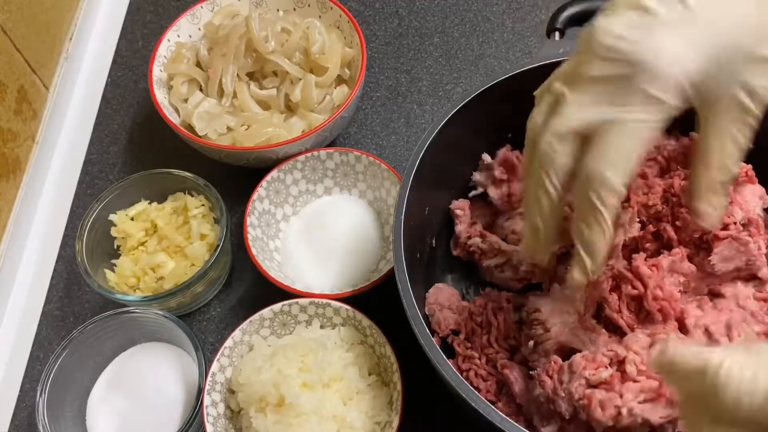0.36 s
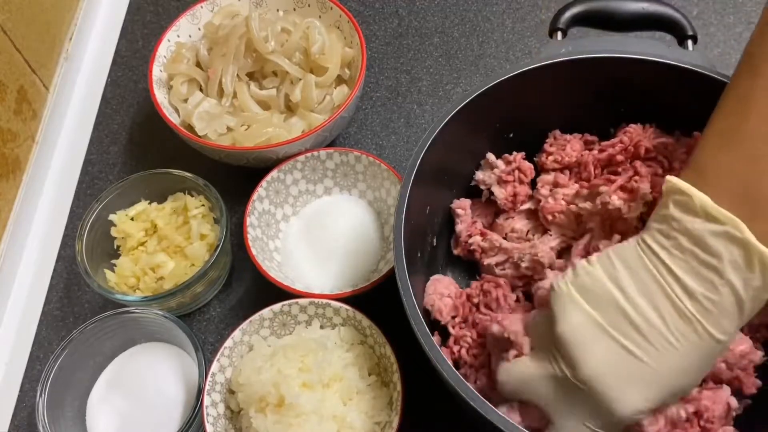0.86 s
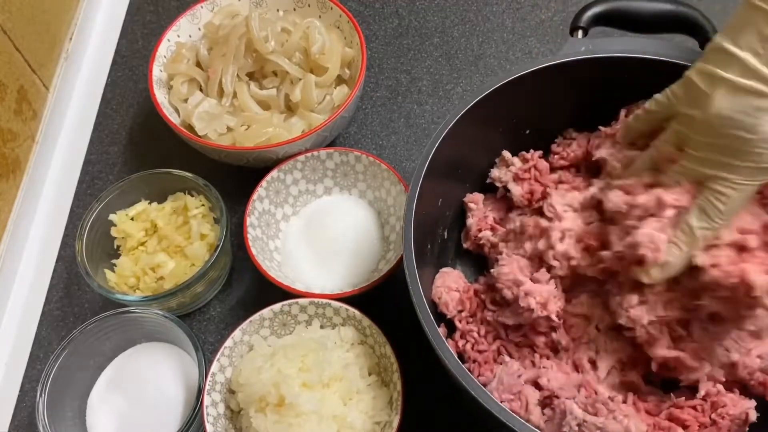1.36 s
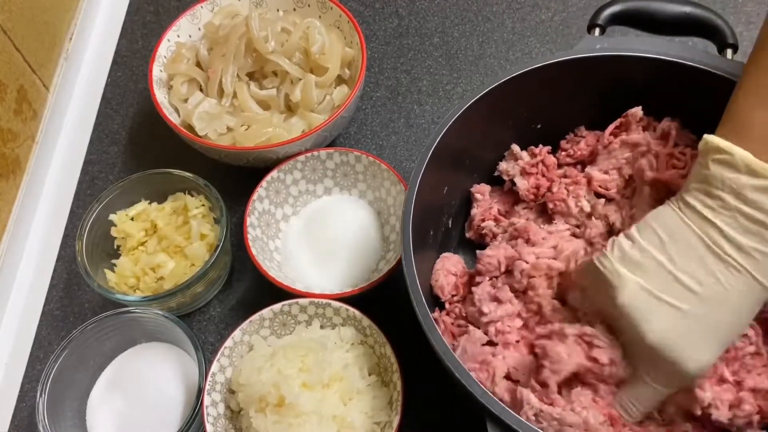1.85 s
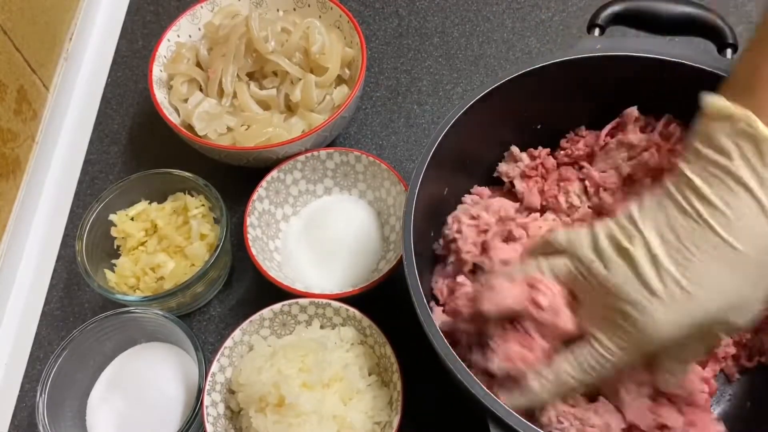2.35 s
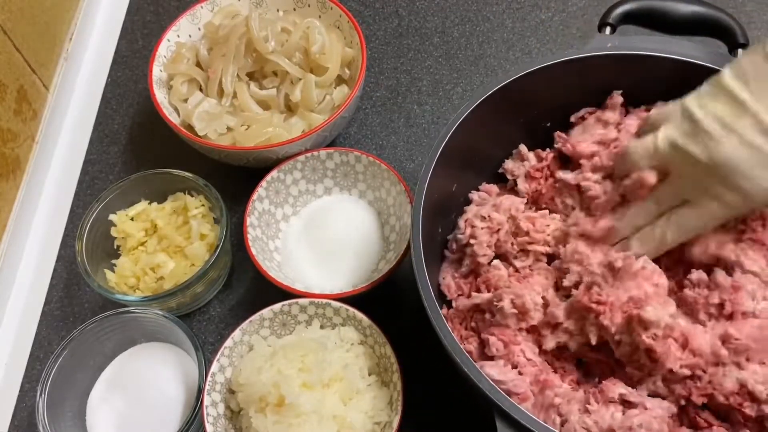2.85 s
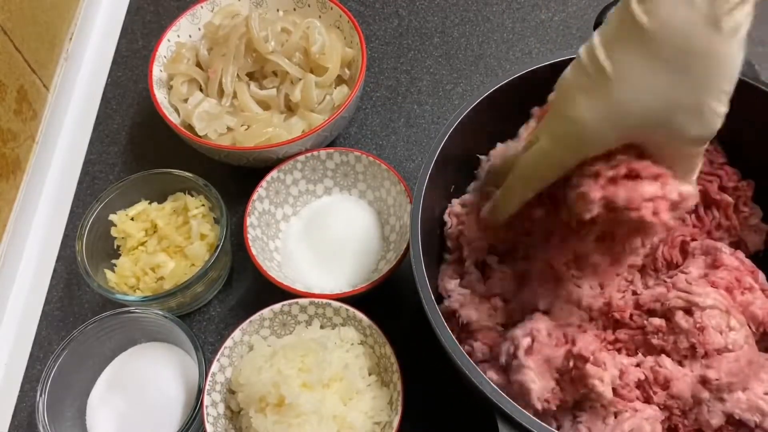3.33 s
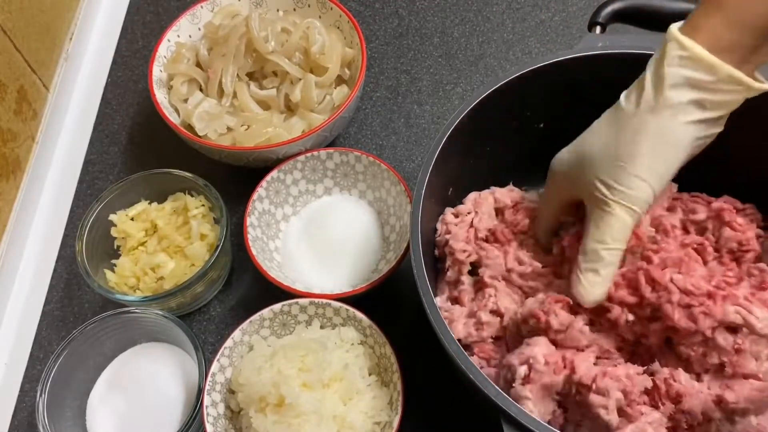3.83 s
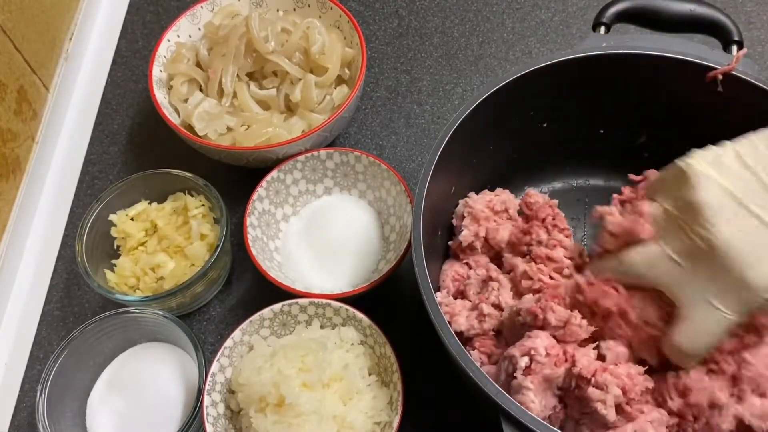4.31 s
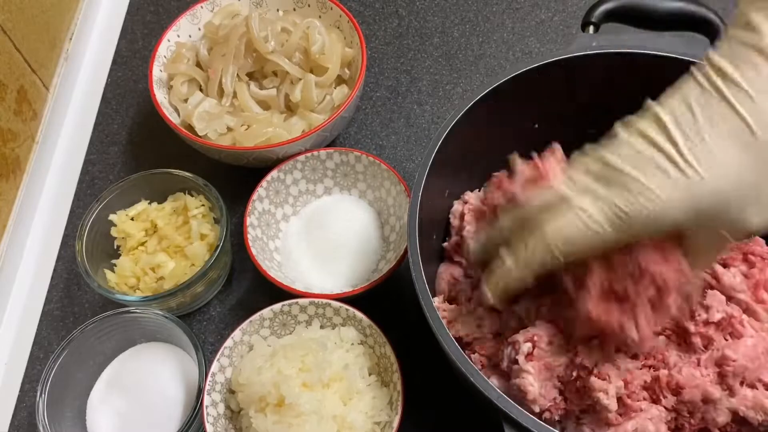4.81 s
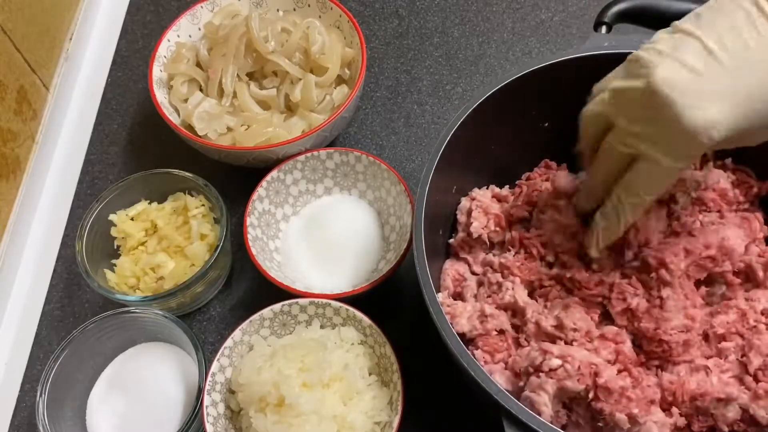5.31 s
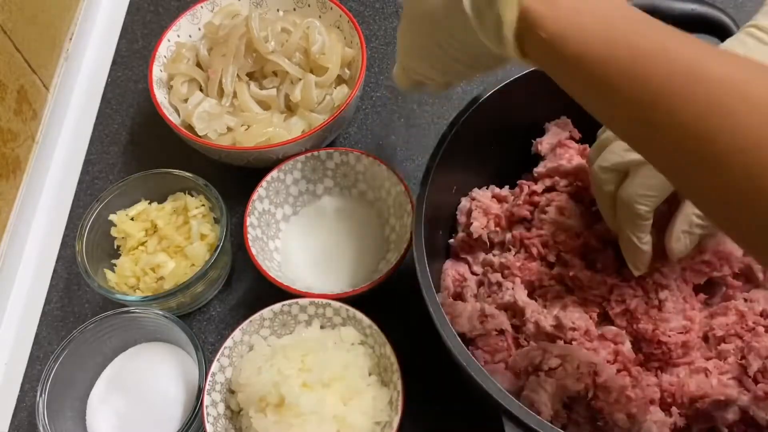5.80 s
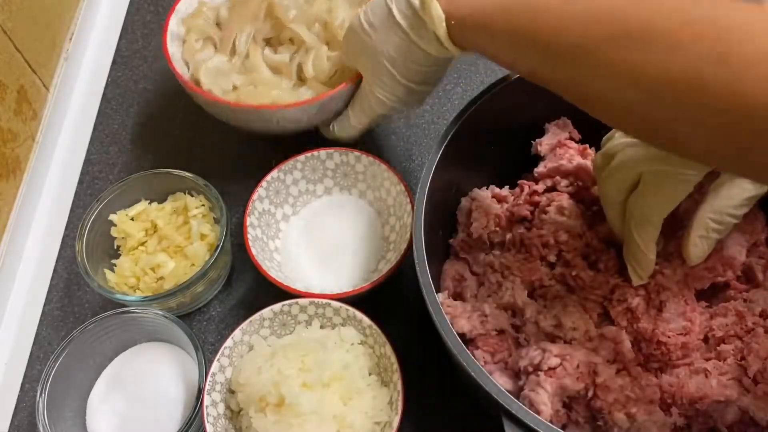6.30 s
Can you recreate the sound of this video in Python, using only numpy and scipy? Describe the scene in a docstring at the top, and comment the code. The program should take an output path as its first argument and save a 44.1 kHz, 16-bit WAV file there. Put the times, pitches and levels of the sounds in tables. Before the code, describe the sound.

Wet, sticky squishing of minced meat being squeezed by a rubber glove, with popping air pockets, low thuds and one hollow pan clank.

```python
"""A gloved hand kneads raw minced meat in a wide metal pan on a kitchen counter, for about six seconds.
From the start filtered noise gives the air, a hollow rush that comes and goes, and the counter's rumble, while
each squeeze swells torn grains, bubbles and glove rustle; pockets of air smack as noise bursts and damped rings.
Half a second in, low damped swings thud through the counter and one knock rings the pan's modes; films of fat
then crack and glove rubber snaps. Near the end the other glove grips a bowl further left, in like bursts."""
import sys
import numpy as np
from scipy import signal
from scipy.fft import rfft, irfft, next_fast_len
from scipy.io import wavfile

SR = 44100
rng = np.random.default_rng(int(sys.argv[2]) if len(sys.argv) > 2 else 0)


def invert_db(x):
    """Field ratio 10**(x/20) for x, a level in decibels (scalar or array-like)."""
    u = np.asarray(x, float) / 20
    return 10 ** u


def to_wav(sig):
    """Store sig (one row per channel, or 1-D mono) as 16-bit WAV at the path in sys.argv[1].

    Samples outside -1..1 are clipped; the rate is SR.
    """
    pcm = np.clip(np.atleast_2d(sig), -1, 1) * 32767
    pcm = np.round(pcm).astype(np.int16)
    wavfile.write(sys.argv[1], SR, pcm.T)  # frames by channels


N = 283122

# Spectrum of the still air. Each row: frequency in Hz, relative density in dB per Hz.
AIR_SPECTRUM = [(15, -2), (25, 6), (109, 7), (181, -0.5), (315, -4), (364, -36), (619, -31.5),
                (1250, -14.5), (2120, -38), (8000, -51), (10400, -45), (17600, -120)]
# Spectrum of the hollow rush. Each row: frequency in Hz, relative density in dB per Hz.
RUSH_SPECTRUM = [(210, -68), (350, -35), (408, 1), (454, -5), (616, -6.5), (762, -21), (900, -13),
                 (1170, -68), (1980, -120)]
# Course of the hollow rush in the room. Each row: time in seconds, level in dB.
RUSH_COURSE = [(0, -67), (.5, -61.5), (1.1, -68.5), (1.32, -70.5), (1.432, -61.5), (1.7, -57), (1.87, -88),
               (2.05, -66), (2.22, -68.5), (2.5, -57.5), (2.85, -57.5), (3.2, -63.5), (3.47, -67),
               (3.7, -66), (4.3, -63.5), (4.76, -72), (5.6, -69.5), (6.42, -67.5)]
# Spectrum of the pushed counter. Each row: frequency in Hz, relative density in dB per Hz.
PUSH_SPECTRUM = [(15, -14), (25, -45), (45, -5.5), (102, -3), (153, -9), (184, -12.5), (320, -22),
                 (420, -73), (700, -120)]
# The hand leans on the pan. Each row: loudest moment in seconds, level in dB,
# swell and fade in seconds per 10 dB (spans below the floors in swells() take the floors).
LEANS = [(0.56, -46, 0.3), (0.93, -39, -0.01), (1.478, -39, 0.04), (1.68, -43.5, 0.19), (2.072, -48, -0.15),
         (2.55, -48.5, 0.05), (2.82, -48.5, 0.27), (3.45, -54.5, 0.12), (3.7, -48.5, 0.17),
         (4.259, -48, -0.04), (4.499, -52, 0.04), (5.03, -52.5, 0.07), (6.06, -49, 0.06)]
# Spectrum of the squelching meat. Each row: frequency in Hz, relative density in dB per Hz.
SQUELCH_SPECTRUM = [(440, -27.5), (750, 10.5), (795, -9.5), (1010, -1.5), (1290, -7), (2220, -3),
                    (2580, -4.5), (3340, -5), (5500, -7.5), (7150, -51.5), (12100, -120)]
# Spectrum of the glove. Each row: frequency in Hz, relative density in dB per Hz.
RUSTLE_SPECTRUM = [(3500, -2.5), (5000, -2.5), (7000, 1.5), (10000, 2), (13000, 0), (15800, -0.5)]
# Squeezes of the hand through the meat. Each row: loudest moment in seconds, squelch level in dB,
# swell and fade in seconds to 10 dB down, glove envelope over squelch envelope in dB.
SQUEEZES = [(0.16, -68, 0.38, 0.14, -8.5), (0.45, -67, 0.12, 0.18, -13.5), (0.68, -56.5, 0.32, 0.22, -6.5),
            (0.908, -55, 0.12, 0.22, -3.5), (1.174, -54, 0.059, 0.16, -5.5), (1.43, -59, 0.085, 0.29, -3.5),
            (1.56, -56.5, 0.086, 0.53, -12), (1.81, -55.5, 0.12, 0.079, -3.5),
            (2.03, -61.5, 0.21, 0.16, -1.5), (2.39, -62, 0.2, 0.14, -4.5), (2.522, -61.5, 0.2, 0.076, -2),
            (2.83, -56.5, 0.061, 0.31, -3.5), (3.07, -57, 0.66, 0.061, -8), (3.28, -62, 0.23, 0.071, -2),
            (3.565, -56.5, 0.14, 0.11, -6.5), (3.68, -51.5, 0.08, 0.075, -12),
            (3.745, -58.5, 0.084, 0.054, -8.5), (3.91, -59.5, 0.12, 0.18, -4),
            (4.13, -63.5, 0.11, 0.89, -3), (4.37, -57.5, 0.1, 0.11, -0.5),
            (4.64, -58.5, 0.073, 0.088, -5.5), (4.848, -70, 0.04, 0.35, 4), (5.04, -60, 0.096, 0.088, 0),
            (5.16, -67.5, 0.043, 0.062, 4.5), (5.3, -64, 0.068, 0.13, -3), (5.58, -65, 0.21, 0.07, -5),
            (5.71, -61, 0.17, 0.095, -9), (5.87, -67, 0.18, 0.19, -9), (6.04, -64.5, 0.27, 0.12, -11),
            (6.19, -70, 0.16, 0.096, -2), (6.37, -64, 0.025, 0.04, -5.5)]
# Fingers deep in the meat muffle the squelch, near the top they leave it bright.
# Each row: time in seconds, spectral tilt in dB per octave.
DEPTH = [(0, -3.5), (.8, 0.5), (1.2, 1), (1.45, -3), (1.56, 1), (1.66, -7), (1.8, -1), (2.1, 1),
         (2.6, -3.5), (3.0, -5), (3.25, -0.5), (3.55, -2), (3.72, -2), (4.1, -0.5), (4.4, -1), (4.65, 1.7),
         (5.2, 0.5), (6.42, 0)]
# Air between fingers, meat and pan wall. Each row: resonance in Hz, mean level in dB.
HOLLOWS = [(1050, -1.5), (1600, -0.5), (2120, 1.5), (2600, -1.5), (3150, -1.5)]
# Coherence of the two sides. Each row: frequency in Hz, left-right likeness.
LIKENESS = [(60, 0.92), (150, 0.93), (300, 0.34), (640, 0.5), (1400, 0.037), (3100, 0.41), (5500, 0.1),
            (6500, 0.97)]
# Air pockets smacking open. Each row: start in seconds, relative level in dB, pitch in Hz, spray over ring in dB.
SMACKS = [(0.146, -48, 2570, -31), (0.842, -41.5, 1570, -1), (0.858, -42, 1060, -6), (0.895, -42, 1010, 1),
          (1.123, -57, 2150, -21), (1.157, -38, 1790, 0.5), (1.182, -36, 920, -3), (1.230, -35, 2110, -19),
          (1.250, -39, 2200, -16), (1.271, -39.5, 2840, -4), (1.261, -38.5, 950, -1),
          (1.401, -44, 2180, -16), (1.426, -40.5, 2190, -18), (1.576, -37.5, 2110, -24),
          (1.712, -38, 2480, -6), (1.772, -30, 1025, -3.5), (1.785, -30, 970, -6), (2.063, -25, 940, -3),
          (2.065, -35.5, 3400, 1), (2.068, -27, 894, -7), (2.073, -28, 2140, -4), (2.077, -32.5, 474, 0),
          (2.431, -40.5, 615, -24), (2.712, -50, 2110, -24), (2.845, -39, 1130, -10),
          (2.863, -27, 1066, -9.5), (2.872, -36, 1600, -10), (3.036, -42, 2340, -6),
          (3.184, -44, 1560, -13), (3.244, -39, 1950, -1), (3.257, -43.5, 1900, -10), (3.3, -44, 910, -9),
          (3.553, -38, 1970, -3), (3.563, -44, 1140, -1), (3.617, -41, 1180, -11), (3.687, -36, 1066, -14),
          (4.358, -43, 1100, 6), (4.376, -37.5, 1600, -1), (4.406, -46, 1200, -4), (4.605, -45, 706, 0),
          (4.654, -39, 710, -1), (4.920, -48, 643, -3), (5.003, -49, 930, -8), (5.084, -39.5, 2150, -18)]
# Air in the pan colours each spray. Each row: resonance in Hz, width in Hz, mean level in dB.
PAN_AIR = [(1600, 180, 0), (2150, 410, 11.5), (3300, 550, 10.5), (4720, 670, 3.5)]
# Thuds of the pan on the counter. Each row: start in seconds, relative level in dB, pitch in Hz,
# 60 dB decay in seconds (at least 0.02).
THUDS = [(0.5, -30, 201, 0.15), (0.883, -37.5, 87, 0.19), (0.93, -36.5, 112.4, 0.25),
         (1.293, -43.5, 76.6, 0.018), (1.388, -37.5, 111, 0.096), (1.462, -37, 81, 0.072),
         (1.669, -34, 92.7, 0.23), (2.075, -38.5, 210, 0.027), (2.088, -37.5, 143, 0.059),
         (2.122, -45.5, 98.3, 0.15), (2.689, -43, 112, 0.097), (2.812, -36, 100, 0.17),
         (3.364, -49, 61.4, 0.12), (3.441, -43.5, 93.4, 0.36), (3.579, -39, 74.5, 0.13),
         (3.67, -32.5, 77, 0.051), (3.718, -36.5, 118, 0.12), (3.99, -50.5, 81, 0.13),
         (4.465, -41.5, 90.5, 0.085), (4.914, -49.5, 88.4, 0.2), (5.151, -46, 96, 0.045),
         (5.658, -51, 95, 0.33), (5.743, -50, 102, 0.47), (5.852, -46, 77.4, 0.32),
         (5.953, -28.5, 110, 0.081), (6.179, -34.5, 121, 0.12)]
# Hard contact on the pan wall. Each row: start in seconds, reference level in dB.
KNOCK = [(0.539, -15)]
# Modes of the pan. Each row: frequency in Hz, level over the knock in dB, undamped 60 dB decay in seconds.
PAN_MODES = [(441, -22, 0.06), (615, -25.5, 0.68), (650, -8, 0.094), (720, -22, 0.032), (800, -18.5, 0.034),
             (921, -22, 0.42), (950, 4.5, 0.015), (1025, -28, 0.15), (1421, -11, 0.68), (1804, -9.5, 0.011),
             (1930, -35, 0.31), (2316, -20.5, 0.053), (3300, -25, 0.049), (3870, -25.5, 0.11),
             (3974, -3, 0.012), (4850, -10, 0.01)]
# Sticky meat cracking off the glove.
# Each row: start in seconds, relative level in dB, pitch in Hz, spray over ring in dB.
CRACKS = [(0.866, -35, 2920, 2), (0.887, -28, 4350, -6), (1.202, -40, 3300, -2), (1.307, -46, 1780, 5),
          (1.792, -35, 1000, -8), (1.904, -31.5, 1120, -19), (2.0615, -23, 940, -16), (2.331, -40, 1170, 1),
          (2.972, -45, 1660, -11), (3.046, -40, 1060, -13), (3.062, -40, 2300, -10),
          (3.088, -47, 1100, -11), (3.305, -39.5, 2040, -22), (3.665, -44, 3120, -3),
          (4.388, -34.5, 1190, -2.5), (4.446, -40, 4300, -14), (4.653, -37.5, 2800, -21),
          (4.678, -41, 3470, -5), (4.779, -39, 4250, -6), (4.831, -38, 2720, -6), (5.158, -45, 5900, -13),
          (5.316, -40, 3660, -1)]
# Glove rubber snapping free. Each row: start in seconds, peak in dB.
SNAPS = [(1.1546, -33), (1.4669, -44), (2.0615, -38), (2.616, -37), (2.7765, -36), (6.048, -44),
         (6.15, -43.5)]
# The other glove grips a bowl. Each row: start in seconds, relative level in dB, pitch in Hz, spray over ring in dB.
GRIPS = [(5.458, -53, 2360, -10), (5.877, -51, 520, -3), (5.994, -48, 880, -11), (6.056, -42, 3100, -22),
         (6.072, -38.5, 5150, -3.5), (6.161, -46, 596, -3.5), (6.15, -43.5, 444, -27),
         (6.18, -38, 544, -31), (6.19, -35, 383, -30), (6.228, -50, 1520, -3)]
# Stereo phase, in steps over frequency. Each row: frequency in Hz, lead of the left in half turns.
STEREO_PHASE = [(0, 0), (260, 0), (520, -.57), (860, -.22), (2070, 0), (7500, 0), (8500, -1), (9500, -1),
                (10450, -2), (11650, -2), (12700, -3), (13650, -3), (14600, -4)]

FLICKER_HZ = 14   # how fast each band of a texture and each hollow flickers
MEAT_LEFT_DB = 1   # left over right


def rms_one(x):
    """Normalisation: scale a signal to unit rms."""
    return x / np.sqrt(np.mean(x ** 2) + 1e-20)


def at_hz(points, hz):
    """Logarithmic frequency scale: read a table between its points."""
    table_hz, value = np.array(points).T
    return np.interp(np.log(hz), np.log(table_hz), value)


def left_right(db):
    """Intensity panning: gains of the two sides for a left-over-right difference in dB."""
    return invert_db([[db / 2], [-db / 2]])


def drift(rate_hz):
    """Low-pass noise: slow chance of unit spread, computed on every 40th sample."""
    pole = np.exp(-2 * np.pi * rate_hz * 40 / SR)
    noise = rng.standard_normal(N // 40 + 2002)
    slow = signal.lfilter([1], [1, -2 * pole, pole * pole], noise)[2000:]   # the filter has settled
    return np.interp(np.arange(N) / 40, np.arange(len(slow)), rms_one(slow))


def swells(rows, order):
    """Energy summation: envelopes rise and fade 10 dB per span, pointed (order 1) or rounded (2); powers add."""
    t, power = np.arange(0, N + 64, 64) / SR, 1e-14
    for s, db, swell_s, fade_s in rows:
        before = (s - t) / max(swell_s, .008)
        after = (t - s) / max(fade_s, .035)
        away = np.where(t < s, before, after)
        power = power + invert_db(db - 10 * away ** order) ** 2
    return np.interp(np.arange(N) / SR, t, np.sqrt(power))


def ring(force, hz, t60):
    """Damped resonance: a unit click sets off a sine of height 1 that falls 60 dB in t60 seconds."""
    r, w = invert_db(-60 / (t60 * SR)), 2 * np.pi * hz / SR
    return signal.lfilter([0, np.sin(w)], [1, -2 * r * np.cos(w), r * r], force + 1e-18)


def banded(source, spectrum, patchy_db, tilt_db=0):
    """Third-octave synthesis: each band has its level, flicker, tilt about 1.5 kHz and coherence; rms 1."""
    out, together = 0, drift(4.7)
    lowest, highest = spectrum[0][0], spectrum[-1][0]
    edges = lowest * 2 ** np.arange(0, np.log2(highest / lowest), 1 / 3)
    for k, (low, high) in enumerate(zip(edges, [*edges[1:], highest])):
        band = signal.butter(2, [low, high + 1], "band", fs=SR, output="sos")
        mid, side = signal.sosfilt(band, source[k % 2])   # neighbours draw on unrelated pairs
        hz = np.sqrt(low * high)
        alike = np.clip(at_hz(LIKENESS, hz), -1, 1)
        flicker_db = patchy_db * (.65 * together + drift(FLICKER_HZ))
        gain = invert_db(at_hz(spectrum, hz) + flicker_db + tilt_db * np.log2(hz / 1500))
        out = out + gain * (np.sqrt(1 + alike) * mid + np.sqrt(1 - alike) * side * [[1], [-1]])
    return rms_one(out)


def shake(level_db, fade_s):
    """Forced vibration: the knocked pan shakes on, its envelope set in dB over the knock."""
    lag_s = 0.0019
    return swells([(s + lag_s, db + level_db, .008, fade_s) for s, db in KNOCK], order=1)


def room_air(hiss):
    """Stationary noise: the still air is shaped noise at a constant mean level."""
    return invert_db(-63) * banded(hiss[::-1], AIR_SPECTRUM, patchy_db=3.0)


def hollow_rush(hiss):
    """Amplitude modulation: shaped noise comes and goes; the knocked pan adds a hollow rattle."""
    course = invert_db(np.interp(np.arange(N) / SR, *np.transpose(RUSH_COURSE)))
    rattle = shake(-15.5, fade_s=0.046)
    return (course + rattle) * banded(hiss, RUSH_SPECTRUM, patchy_db=2.0)


def counter_rumble(hiss):
    """Structure-borne noise: the counter rumbles louder while the hand leans on the pan."""
    push = swells([(s, db, span_s, span_s) for s, db, span_s in LEANS], order=1)
    resting = invert_db(-56)
    return np.hypot(push, resting) * banded(hiss, PUSH_SPECTRUM, patchy_db=1.27)


def grains(per_s, uneven_db):
    """Impulse process: tiny ruptures fall in random clumps, with a tail of sizes; two unrelated pairs."""
    tail_db = uneven_db * np.minimum(rng.exponential(1, (2, 2, N)), 5)
    sizes = invert_db(tail_db) * rng.standard_normal((2, 2, N))
    chance = per_s * invert_db(2.2 * drift(15)) / SR
    return sizes * (rng.random((2, 2, N)) < chance) + 1e-9


def hollows():
    """Cavity resonance: hollows between fingers and meat open and close, each singing at its own pitch."""
    hiss, out = rng.standard_normal(N), 0
    for hz, db in HOLLOWS:
        tone = rms_one(ring(hiss, hz, 60 / hz))   # falls 60 dB in 60 cycles
        out = out + tone * invert_db(db + 4.5 * drift(FLICKER_HZ))
    return rms_one(out)


def bubbles():
    """Bubble resonance: trapped air bursts in random clumps and rings briefly, over three octaves."""
    per_s, uneven_db, clump_db, cycles = 300, 3, 5.5, 25
    sizes = invert_db(uneven_db * np.minimum(rng.exponential(1, N), 5)) * rng.standard_normal(N)
    clicks = sizes * (rng.random(N) < per_s * invert_db(clump_db * drift(12)) / SR)
    pitches, dealt = np.geomspace(700, 5200, 12), rng.integers(0, 12, N)
    return rms_one(sum(ring(clicks * (dealt == k), hz, cycles / hz) for k, hz in enumerate(pitches)))


def squelching_meat():
    """Rupture noise: squeezes, and the shaken pan, excite tearing grains, singing hollows and bubbles."""
    squeeze = swells([row[:4] for row in SQUEEZES], order=2) + shake(-30, fade_s=0.035)
    tilt_db = np.interp(np.arange(N) / SR, *np.transpose(DEPTH))
    tearing = banded(grains(1500, uneven_db=2.0), SQUELCH_SPECTRUM, patchy_db=2.2, tilt_db=tilt_db)
    return squeeze * (tearing + invert_db(-9) * hollows() + invert_db(-13) * bubbles())


def glove_rustle():
    """Friction noise: each squeeze rubs the glove into a dense rain of grains."""
    rows = [(s, db + glove_db, swell_s, fade_s) for s, db, swell_s, fade_s, glove_db in SQUEEZES]
    return swells(rows, order=2) * invert_db(5) * banded(grains(5600, uneven_db=0.0), RUSTLE_SPECTRUM, patchy_db=1.37)


def smacks(rows, left_db, burst_s, rise_s, cycles):
    """Impulsive excitation: each opening spits ragged noise, coloured anew, and rings at its own pitch."""
    out, t = np.zeros((2, N + 4096)), np.arange(4096) / SR
    for s, db, hz, spray_db in rows:
        noise, ragged = rng.standard_normal((2, 4096))
        burst = noise * np.abs(ragged) * np.minimum(t / rise_s, 1) * np.exp(-t / burst_s)
        spray = 0
        for k, (air_hz, width_hz, air_db) in enumerate(PAN_AIR):
            colour = width_hz * invert_db(air_db + 4 * rng.standard_normal()) * (-1) ** k
            air_t60 = np.log(1000) / (np.pi * width_hz)
            spray = spray + colour * ring(burst, air_hz, air_t60)
        pop = ring(burst, hz, cycles / hz)   # falls 60 dB in this many cycles
        pop = pop / np.abs(pop).max() + invert_db(spray_db) * spray / np.abs(spray).max()
        i = round(s * SR)
        place_db = left_db + 4.5 * rng.standard_normal()
        out[:, i:i + 4096] += invert_db(db - 7) * pop * left_right(place_db)
    return out[:, :N]


def kitchen(x):
    """Reverberation: six feedback delays a side return the sound, duller on every round."""
    t60_s, wall_cut_hz = .2, 5000
    out, dull = np.zeros((2, N)), np.exp(-2 * np.pi * wall_cut_hz / SR)
    for k, lag in enumerate((rng.uniform(.008, .03, 12) * SR).astype(int)):
        loop, gain, state = x.copy(), invert_db(-60 * lag / SR / t60_s), [0.]
        for i in range(lag, N, lag):
            back, state = signal.lfilter([gain * (1 - dull)], [1, -dull], loop[i - lag:i], zi=state)
            loop[i:i + lag] += back[:N - i]
        out[k % 2] += (loop - x) * (-1) ** (k // 2)
    return out


def thuds():
    """Damped oscillation: a soft push swings the counter; the pan base adds a shorter bump at 290 Hz."""
    base_hz, base_db, base_share = 290, -15, 0.089   # the share is of the swing's decay time
    out, t = np.zeros(N + SR), np.arange(SR // 2) / SR
    for s, db, hz, t60 in THUDS:
        fade_db = -60 * t / max(t60, .02)
        swing = np.sin(2 * np.pi * hz * t) * (1 - np.exp(-t * hz * 2.3)) ** 2 * invert_db(fade_db)
        bump = np.sin(2 * np.pi * base_hz * t) * (1 - np.exp(-t * base_hz)) * invert_db(fade_db / base_share)
        i = round(s * SR)
        swing, bump = swing / np.abs(swing).max(), bump / np.abs(bump).max()
        out[i:i + len(t)] += invert_db(db) * (swing + invert_db(base_db) * bump)
    return out[:N]


def knock():
    """Modal excitation: a chattering contact cracks and rings every pan mode, at another phase on each side."""
    contact_s, crack_s, crack_db = 0.0019, 0.0027, -4
    spread_rad, spread_hz = 2.3, 1100   # the phase difference shrinks above spread_hz
    damped_s, damping_db_per_s = 0.054, 269   # the meat settles against the wall and stills the ring
    out, t = np.zeros((2, N)), np.arange(1500) / SR
    band = signal.butter(4, [500, 5400], "band", fs=SR, output="sos")
    for s, db in KNOCK:
        i = round(s * SR)
        crack = rng.standard_normal((2, len(t))) * np.minimum(t / contact_s, 1) * np.exp(-t / crack_s)
        out[:, i:i + len(t)] += invert_db(db + crack_db) * signal.sosfilt(band, crack)
        damping_db = damping_db_per_s * np.clip(np.arange(N) / SR - s - damped_s, 0, 1)
        for hz, level_db, t60 in PAN_MODES:
            force = np.zeros((2, N))
            apart = spread_rad * min(1, spread_hz / hz) * np.array([[.5], [-.5]])
            phase = rng.uniform(0, 2 * np.pi) + apart
            chatter = np.cos(2 * np.pi * hz * t + phase) * t * np.exp(-t / contact_s)
            force[:, i:i + len(t)] = 2 * chatter / np.abs(chatter).sum(axis=1, keepdims=True)
            out += invert_db(db + level_db - damping_db) * ring(force, hz, t60)
    return out


def snaps():
    """Sudden release: freed rubber gives a bright tick of differenced noise, a few milliseconds long."""
    out, t = np.zeros(N + 512), np.arange(512) / SR
    for s, db in SNAPS:
        tick = np.diff(rng.standard_normal(512), prepend=0) * np.exp(-t / 0.0057)
        out[round(s * SR):][:512] += invert_db(db) * tick / np.abs(tick).max()
    return out[:N]


def scene():
    """Superposition: hand, meat, pan and counter add up in a small kitchen."""
    hiss = rng.standard_normal((2, 2, N))
    background = room_air(hiss) + hollow_rush(hiss)
    counter = (thuds() + counter_rumble(hiss)) * left_right(1.2)
    meat = squelching_meat() * left_right(MEAT_LEFT_DB)
    # escaping air bursts for milliseconds; a film of fat tears almost at once
    hits = smacks(SMACKS, MEAT_LEFT_DB, burst_s=.004, rise_s=.0016, cycles=24)
    hits += smacks(CRACKS, MEAT_LEFT_DB, burst_s=.0012, rise_s=.0002, cycles=19)
    hits += snaps()
    hits += smacks(GRIPS, 5.5, burst_s=.004, rise_s=.0016, cycles=17)
    pan = knock() * left_right(MEAT_LEFT_DB)
    # the walls return the blow, hardly the ring after it: it falls 700 dB per second
    blow = pan * invert_db(-700 * np.clip(np.arange(N) / SR - KNOCK[0][0], 0, 1))
    echo = invert_db(-20) * kitchen((hits + blow).mean(axis=0))
    return background + counter + meat + glove_rustle() + hits + pan + echo


def top_cut(x):
    """Nothing passes above the cut-off."""
    return signal.sosfilt(signal.butter(12, 16260, fs=SR, output="sos"), x)


def record(dry):
    """Stereo phase: the sides are shifted by steps, so their sum cancels in stripes; 15.9 kHz is the top."""
    size = next_fast_len(N + 4096)
    hz = np.arange(size // 2 + 1) * SR / size
    lead_rad = np.pi * np.interp(hz, *np.transpose(STEREO_PHASE))
    shift = np.exp(1j * np.outer([.5, -.5], lead_rad))
    heard = irfft(rfft(dry, size) * shift * (hz < 15900), size)[:, :N]
    return top_cut(heard)


dry = scene()
out = record(dry)
to_wav(out)
```